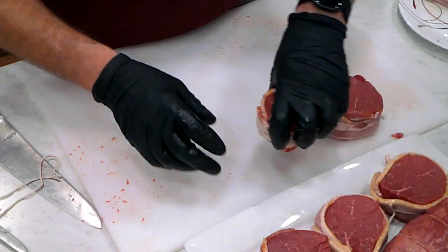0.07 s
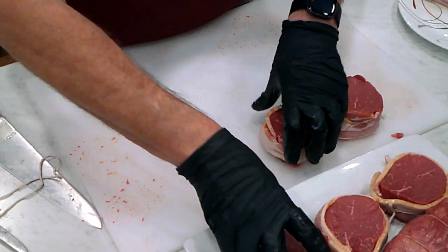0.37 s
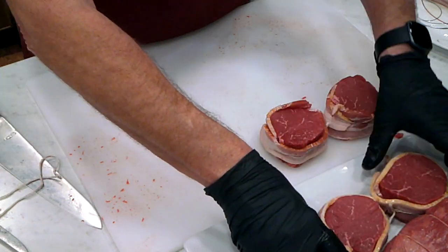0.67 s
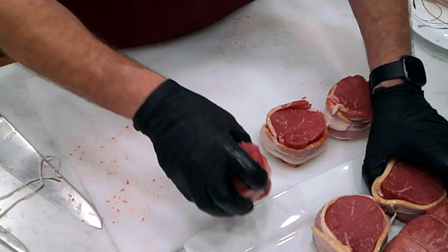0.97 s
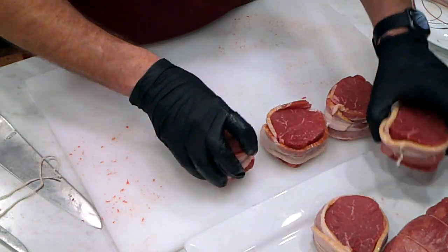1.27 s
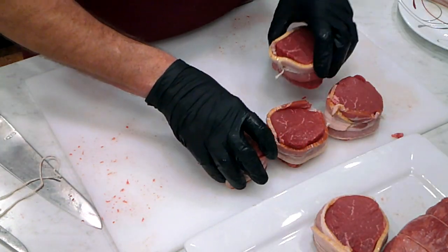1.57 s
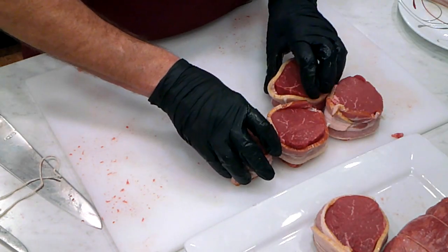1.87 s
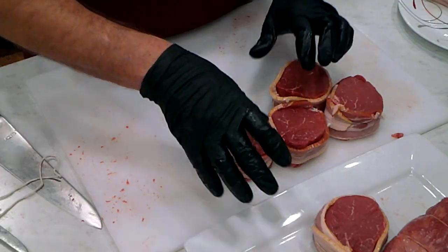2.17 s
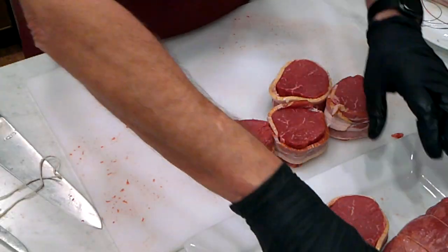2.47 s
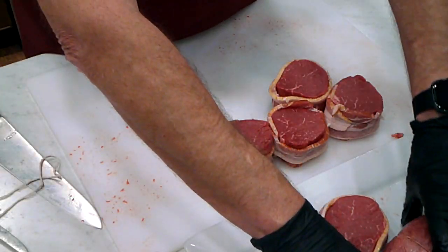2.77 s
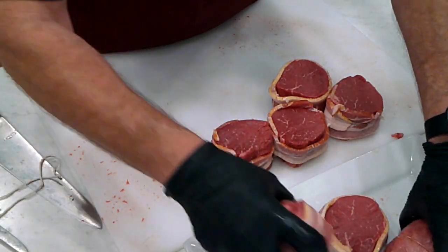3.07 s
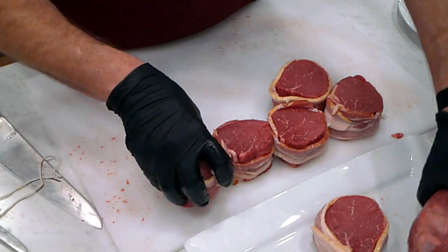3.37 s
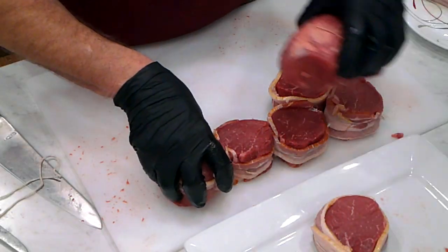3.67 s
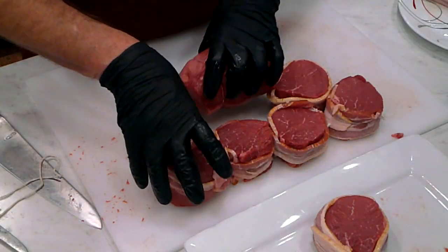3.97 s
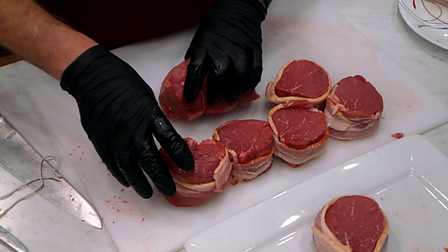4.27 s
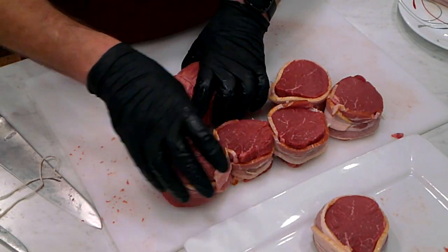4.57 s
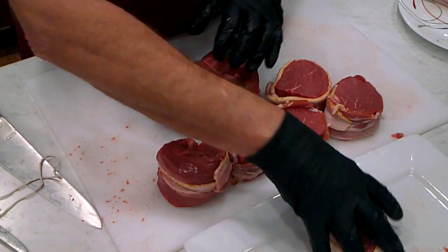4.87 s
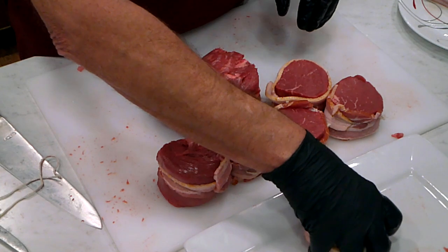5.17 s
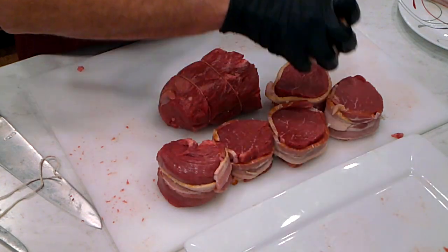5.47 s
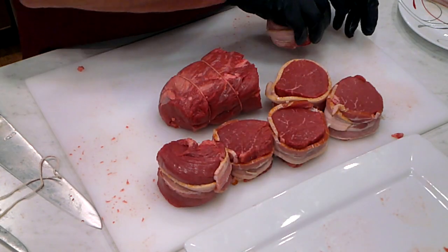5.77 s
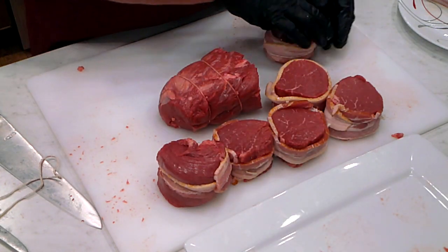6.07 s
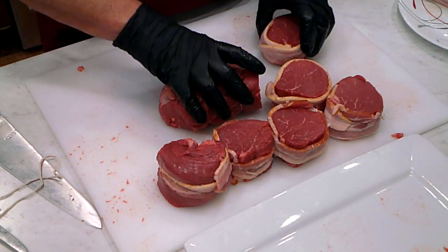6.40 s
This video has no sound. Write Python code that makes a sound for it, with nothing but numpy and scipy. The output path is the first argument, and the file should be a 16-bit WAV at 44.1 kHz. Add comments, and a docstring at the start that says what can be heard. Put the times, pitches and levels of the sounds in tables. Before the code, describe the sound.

Raw meat lands on a plastic cutting board in a few wet thuds, with faint glove rustles over a steady appliance hum.

```python
"""Raw meat on a cutting board

Gloved hands set pieces of raw meat on a plastic board and nudge them into rows. Each impact excites
the board's damped modes under a wet slap, and a small kitchen reverberates. Stick-slip friction makes
gloves rustle and meat squeak; tacky meat smacks, and a brushed china platter rings faintly.
An appliance hums steadily behind it all, with fan noise and a faint high whine."""
import sys
import numpy as np
from scipy import signal
from scipy.fft import rfft, irfft
from scipy.io import wavfile
from scipy.ndimage import uniform_filter1d, minimum_filter1d

SR = 44100
rng = np.random.default_rng(int(sys.argv[2]) if len(sys.argv) > 2 else 0)


def file_out(sig):
    """Save sig as 16-bit WAV at sys.argv[1]."""
    # one column per channel
    cols = np.atleast_2d(sig).T
    # limit, then scale
    lim = np.clip(cols, -1, 1)
    pcm = np.round(lim * 32767).astype(np.int16)
    wavfile.write(sys.argv[1], SR, pcm)


N = 288414

# spectrum of the fan's air noise: f/Hz, relative level/dB
FAN_SPECTRUM = [(12, -57), (20, -29), (47, -1.5), (87, -4), (148, -4), (324, -11), (362, -11.5), (565, -11),
                (667, -15), (725, -15), (811, -17.5), (1670, -24), (6020, -29.5), (14300, -36.5),
                (15500, -54)]
# stereo width of the fan noise: f/Hz, side minus mid level/dB
FAN_SIDE = [(150, -63), (300, -38), (550, -25), (1000, -9.5), (2000, -3.5), (4000, -1.5), (8000, -1),
            (14000, 0.5)]
# motor partials: f/Hz, level/dB
MOTOR_PARTIALS = [(59.2, -53.5), (118.4, -61), (145.3, -55.5), (365, -65.5), (419.9, -62.5), (559.9, -65.5),
                  (586.8, -72), (710.6, -60.5)]
# stereo width of friction and reverberation: f/Hz, side minus mid level/dB
WORK_SIDE = [(150, -74), (300, -68), (550, -78), (1000, -40), (2000, -18), (4000, -11.5), (8000, -3.5),
             (14000, 2.5)]
# a glove grips or lets go: peak t/s, level/dB, centre f/Hz, rise plus fall time/s
GLOVE_RUBS = [(0.014, -50.5, 8050, 0.063), (0.608, -53.5, 5500, 0.04), (1.025, -48, 5230, 0.035),
              (1.266, -54, 5860, 0.048), (1.941, -56, 4580, 0.076), (2.328, -56.5, 7500, 0.04),
              (3.083, -57.5, 3500, 0.052), (3.168, -53.5, 6500, 0.089), (4.969, -50, 4900, 0.055),
              (5.434, -45.5, 5860, 0.065), (6.365, -52.5, 5760, 0.16), (6.417, -46, 10100, 0.036)]
# meat is dragged over board or platter: peak t/s, level/dB, centre f/Hz
MEAT_DRAGS = [(0.025, -52, 2630), (4.997, -47, 2050), (5.425, -53, 2080), (5.763, -42, 1200)]
# meat smacks against glove or board, broad contacts sounding low: t/s, level/dB, centre f/Hz
MEAT_SMACKS = [(0.054, -48, 4350), (0.132, -50.5, 5960), (0.618, -53, 4800), (0.78, -50.5, 4900),
               (0.972, -48, 1400), (1.191, -54, 1150), (1.337, -46.5, 5400), (2.017, -54.5, 4460),
               (2.299, -49, 5200), (3.175, -42, 3740), (3.435, -47, 1550), (4.263, -50.5, 7500),
               (4.348, -48.5, 2350), (4.557, -49.5, 4000), (4.737, -51, 3800), (5.7328, -35.5, 1210),
               (5.941, -53, 2960)]
# reverberation time of the kitchen before scaling by `decay`: f/Hz, T60/s
ROOM_DECAY = [(100, 0.45), (260, 0.46), (700, 0.47), (1800, 0.43), (5000, 0.35), (14000, 0.075)]
# frequency response of the reverberation: f/Hz, gain/dB
ROOM_RESPONSE = [(40, -26), (90, 4), (140, 3), (250, -1.5), (500, -6.5), (900, -2.5), (1300, -2),
                 (2300, -3.5), (4000, -3.5), (12000, -8)]
# meat lands or settles; a flatter landing is quicker and rings brighter:
# t/s, level/dB, push f/Hz, ring gain/dB, ring tilt/(dB per octave)
LANDINGS = [(1.371, -4, 416, 2, 2.5), (1.4243, -22, 167, 0.5, 2), (2.995, -38, 300, 2, -4.5),
            (3.1956, -3, 490, 1, 2.5), (3.2302, -12.5, 397, -6.5, -2.5), (4.347, -34.5, 496, -11, 7),
            (5.1432, -32, 440, 3, -1.5), (5.6004, -10.5, 416, -3, -0.5), (5.783, -18, 383, -3.5, -1.5),
            (6.002, -29, 330, -12.5, -5.5), (6.255, -37, 300, 3.5, -3)]
# modes of the board on the counter: f/Hz, relative level/dB, T60/s
BOARD_MODES = [(142.6, -21, 0.11), (171, -19, 0.091), (285, -33, 0.047), (406, -23.5, 0.08),
               (440, -23, 0.35), (518, -25, 0.48), (693, -21.5, 0.04), (1083, -20, 0.045),
               (1187, -13, 0.071), (1221.6, -25, 0.096), (1270, -41, 0.078), (1417, -40, 0.1),
               (1530, -41.5, 0.18), (1882, -34, 0.025), (2212, -25, 0.11), (2650, -38, 0.06)]
# spectrum of the wet contact: f/Hz, relative level/dB
SLAP_SPECTRUM = [(60, -36), (200, 4), (500, 5.5), (900, 5.5), (1600, 2.5), (2500, -8), (3200, -13.5),
                 (5000, -24), (9000, -36.5), (16000, -46)]
# the platter is brushed or jogged: t/s, level/dB
CHINA_TOUCHES = [(4.992, -64), (5.438, -55.5), (5.601, -57)]
# modes of the platter: f/Hz, relative level/dB, T60/s
CHINA_MODES = [(2030, -7, 0.27), (2140, 10, 0.12), (3730, -1, 0.5), (4620, -5, 0.5), (4800, -12, .3),
               (5518, -21, .3)]


def amp(db):
    """Converts a level to an amplitude ratio."""
    return 10 ** (np.asarray(db) / 20)


def unit(x):
    """Normalises to an rms of 1."""
    return x / np.sqrt(np.mean(x ** 2) + 1e-20)


def read(points, hz):
    """Interpolates a table on a log-frequency axis."""
    f, value = np.transpose(points)
    return np.interp(np.log(hz + 1), np.log(f + 1), value)


def add(mix, s, sound):
    """Superposition: a sound joins the mix at time s."""
    start = round(s * SR)
    sound = sound[..., max(-start, 0):]
    part = mix[:, max(start, 0):][:, :sound.shape[-1]]
    part += sound[..., :part.shape[1]]


def colour(x, points):
    """Linear filtering by a table of f/Hz, gain/dB."""
    size = x.shape[-1]
    return irfft(rfft(x) * amp(read(points, np.fft.rfftfreq(size, 1 / SR))), size)


def diffuse_pair(noises, side_db):
    """Diffuse-field coherence: two close points receive like bass and unlike treble."""
    size = noises.shape[-1]
    ratio = amp(read(side_db, np.fft.rfftfreq(size, 1 / SR)))
    mid, side = rfft(noises) / np.sqrt(1 + ratio ** 2)
    return irfft(np.array([mid + ratio * side, mid - ratio * side]), size)


def drift(rate_hz):
    """Low-pass noise: a slow random wander of rms 1."""
    hz = np.fft.rfftfreq(N, 1 / SR)
    return unit(irfft(rfft(rng.standard_normal(N)) * np.exp(-(hz / rate_hz) ** 2), N))


def appliance(air_db=-46.99, waver=0.079, wander_hz=0.65, whine_hz=15734, whine_db=-72.5):
    """Broadband fan noise lies under a line spectrum: wavering motor partials and an electronic whine."""
    noise = diffuse_pair(rng.standard_normal((2, N)), FAN_SIDE)
    air = amp(air_db) * unit(colour(noise, FAN_SPECTRUM))
    hum = np.zeros(N)
    for hz, db in MOTOR_PARTIALS:
        strength = amp(db) * (1 + waver * drift(rate_hz=0.94))
        cycles = np.cumsum(hz + wander_hz * drift(rate_hz=3.28)) / SR + rng.random()
        hum += strength * np.sin(2 * np.pi * cycles)
    whine = amp(whine_db) * np.sin(2 * np.pi * whine_hz * np.arange(N) / SR)
    return air + np.sqrt(2) * (hum + whine)


def friction(s, db, centre_hz, octaves, rise_s, fall_s, slips_per_s=1700, smooth=0.19):
    """Stick-slip friction: tiny slips crowd into a noise band that peaks at s. Returns start, sound."""
    t = np.arange(-SR // 4, SR // 4) / SR
    slips = rng.standard_normal((2, len(t))) * (smooth + (rng.random(len(t)) < slips_per_s / SR))
    hz = np.fft.rfftfreq(len(t), 1 / SR)
    band = np.exp(-(np.log2((hz + 1) / centre_hz) / octaves) ** 2 / 4)
    grain = unit(diffuse_pair(irfft(rfft(slips) * band, len(t)), WORK_SIDE))
    envelope = np.exp(-np.maximum(-t / rise_s, t / fall_s))
    return s + t[0], amp(db) * grain * envelope


def glove_rub(s, db, hz, length_s, rise_share=0.38):
    """Broadband friction: a glove's rustle swells and lets go."""
    rise_s = length_s * rise_share
    return friction(s, db, hz, octaves=0.7, rise_s=rise_s, fall_s=length_s - rise_s)


def kitchen(x, decay, build_s=0.0043, bend=1.08):
    """Reverberation: dense reflections build up, then each band decays at its own rate."""
    noise = diffuse_pair(rng.standard_normal((2, SR // 2)), WORK_SIDE)
    hz, t, bands = signal.stft(noise, SR, nperseg=256)
    t60 = decay * read(ROOM_DECAY, hz)[:, None]
    fade = np.exp(-np.log(1000) * (t / t60) ** bend)
    tail = signal.istft(bands * fade, SR, nperseg=256)[1]
    onset = 1 - np.exp(-(np.arange(tail.shape[1]) / SR / build_s) ** 2)
    tail = colour(tail / np.linalg.norm(tail[0] * onset), ROOM_RESPONSE) * onset
    tail *= np.clip(np.linspace(2, 0, tail.shape[1]), 0, 1) ** 2  # the last echoes sink to silence
    return signal.fftconvolve(np.atleast_2d(x), tail, axes=1)


def meat_drag(s, db, hz, overtone_db=-9):
    """Narrowband friction: sliding meat gives a dull squeak and its second harmonic."""
    shape = dict(octaves=0.16, rise_s=0.016, fall_s=0.017)
    start, fundamental = friction(s, db, hz, **shape)
    _, overtone = friction(s, db + overtone_db, 2 * hz, **shape)
    return start, fundamental + overtone


def smack(s, db, hz):
    """Adhesion: a tacky contact snaps in a short burst; low smacks span more octaves."""
    return friction(s, db, hz, octaves=0.41 * (4500 / hz) ** 0.3, rise_s=0.0007, fall_s=0.0084)


def glove_ticks(per_s=3.5, db=-60.5, hz=4500, count=60):
    """Poisson process: moving gloves tick at random. Returns rows of t/s, level/dB, centre f/Hz."""
    times = np.cumsum(rng.exponential(1, count)) / per_s
    octaves = rng.uniform(-0.578, 0.98, count)
    return [(s, db, hz * 2 ** octave) for s, octave in zip(times, octaves) if s < N / SR]


def wet_slap(age, grip_s=0.00044, fall_s=0.0073):
    """Contact noise: a wet face spreading over the board gives a fast-decaying burst."""
    noise = unit(colour(rng.standard_normal(len(age)), SLAP_SPECTRUM))
    return noise * np.exp(-age / fall_s) * (1 - np.exp(-age / grip_s))


def board_ring(age, db, ring_db, tilt_db, flex_hz=587, flex_t60_s=0.03, soft_hz=2900):
    """Free vibration: the board's modes and the flexing spot under the meat decay exponentially."""
    modes = [(hz, ring_db + level + tilt_db * np.log2(hz / 1000), t60) for hz, level, t60 in BOARD_MODES]
    flex = (flex_hz, 2 + 1.6 * db, flex_t60_s)  # lighter landings flex the spot less
    ring = sum(amp(level) * np.exp(-np.log(1000) * age / t60) * -np.sin(2 * np.pi * hz * age)
               for hz, level, t60 in modes + [flex])
    softness = signal.butter(4, soft_hz, fs=SR, output="sos")  # flesh has no hard edge to click with
    return signal.sosfiltfilt(softness, ring)


def meat_landing(s, db, push_hz, ring_db, tilt_db, lead_s=0.003002, slap_db=-18, room_db=-3):
    """Impact excitation: a soft mass pushes the board down once, and it rings on under the wet slap."""
    t = np.arange(SR // 2) / SR - lead_s
    phase = 2 * np.pi * push_hz * t
    push = -np.sqrt(2) * np.sin(phase) * np.exp(-(phase / 1.43) ** 2 / 2)  # one swing down and back
    ring = board_ring(np.maximum(t, 0), db, ring_db, tilt_db)
    slap = amp(ring_db + slap_db + tilt_db) * wet_slap(np.maximum(t + lead_s / 2, 0))
    direct = push + ring + slap
    to_walls = push + amp(-3) * ring + amp(3) * slap
    low_cut = signal.butter(3, 100, "high", fs=SR, output="sos")  # a small board radiates no deep bass
    direct, to_walls = signal.sosfilt(low_cut, amp(db) * np.array([direct, to_walls]))
    heard = amp(room_db) * kitchen(to_walls, decay=0.94)
    heard[:, :len(t)] += direct
    return s - lead_s, heard


def platter(s, db, swell_s=0.0037):
    """Resonance: a soft touch sets the china's damped modes ringing faintly."""
    t = np.arange(SR // 2) / SR
    ring = np.zeros((2, len(t)))
    for hz, level, t60 in CHINA_MODES:
        cycles = hz * t + rng.random((2, 1)) / 4
        ring += amp(level) * np.exp(-np.log(1000) * t / t60) * np.sin(2 * np.pi * cycles)
    return s, amp(db) * ring * (1 - np.exp(-t / swell_s))


def scene(handling_room_db=-5):
    """Superposition of the appliance, landings, platter and handling noise with its reverberation."""
    out = appliance()
    for row in LANDINGS:
        add(out, *meat_landing(*row))
    for row in CHINA_TOUCHES:
        add(out, *platter(*row))
    handling = np.zeros((2, N))
    for row in GLOVE_RUBS:
        add(handling, *glove_rub(*row))
    for row in MEAT_DRAGS:
        add(handling, *meat_drag(*row))
    for row in MEAT_SMACKS + glove_ticks():
        add(handling, *smack(*row))
    return out + handling + amp(handling_room_db) * kitchen(handling, decay=0.76)[:, :N]


def record(dry, ceiling=0.92, edge_hz=15950):
    """Peak limiting holds the hardest slaps under full scale; a low-pass filter bounds the bandwidth."""
    gain = np.minimum(ceiling / (abs(dry).max(0) + 1e-9), 1)
    held = minimum_filter1d(gain, size=161)
    smoothed = uniform_filter1d(uniform_filter1d(held, size=81), size=81)
    low_pass = signal.firwin(1023, edge_hz, window=("kaiser", 9), fs=SR)
    return signal.oaconvolve(dry * smoothed, low_pass[None], "same")


dry = scene()
out = record(dry)
file_out(out)
```